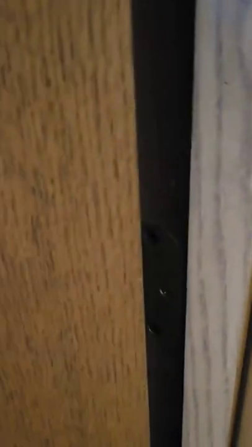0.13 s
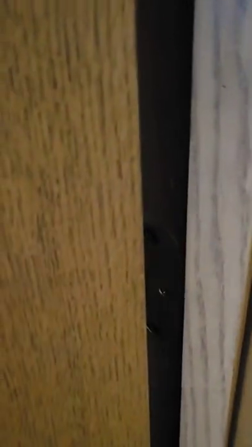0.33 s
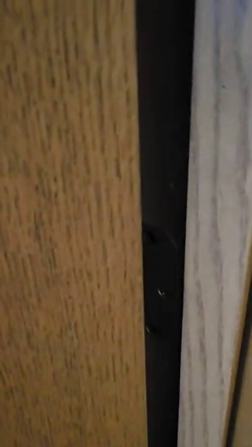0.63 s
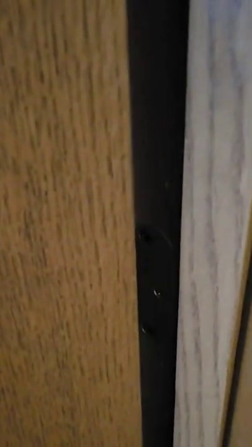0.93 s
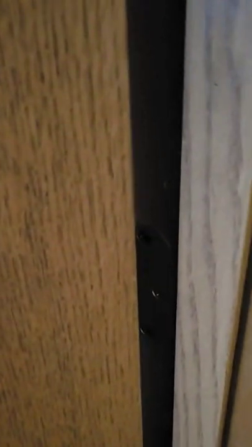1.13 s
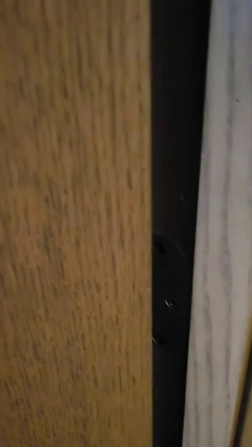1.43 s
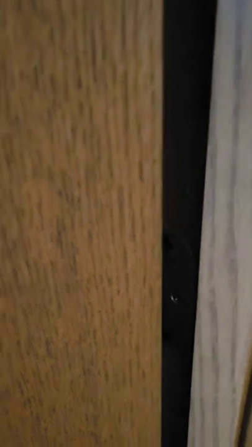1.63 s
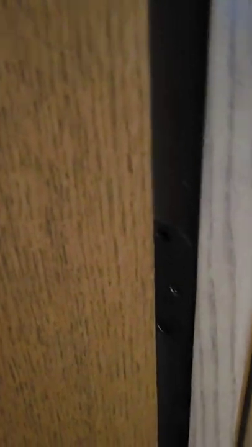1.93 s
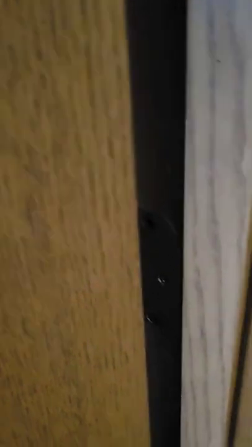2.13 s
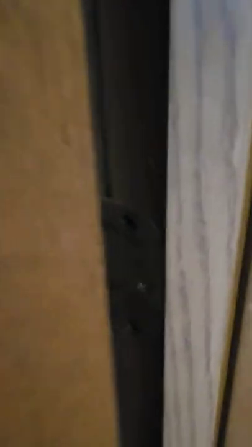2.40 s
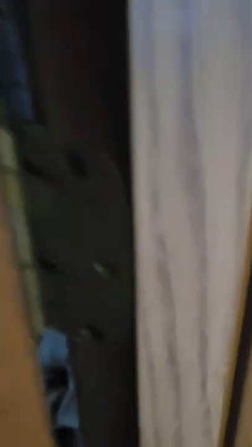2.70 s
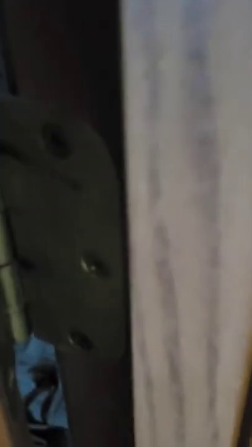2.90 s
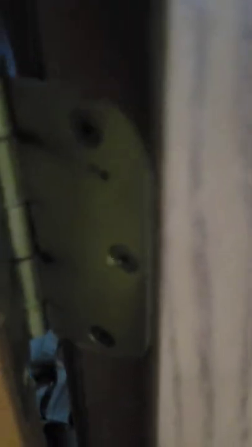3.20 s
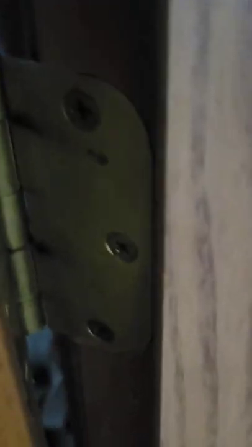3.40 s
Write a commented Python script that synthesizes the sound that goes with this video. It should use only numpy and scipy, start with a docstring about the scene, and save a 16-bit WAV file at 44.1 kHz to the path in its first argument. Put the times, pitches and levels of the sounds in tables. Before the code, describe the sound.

Close to the microphone, a door hinge squeaks several times with thin whistles in between, then lets out a longer squeal that falls into a creak and starts again. A faint hum fills the quiet room.

```python
"""Dry door hinge

A door is rocked to and fro, close by, in a quiet room with mains hum and soft handling bumps. The pin
sticks and slips, ringing hinge leaf and door: each push is an arching squeak that breaks into a rasp,
each return a thin whistle. Then the door swings wide: a second knuckle squeals along with the whistle,
and the stick-slip drops step by step to a slow creak, stops, and starts to squeal again."""
import sys
import numpy as np
from scipy import signal
from scipy.fft import rfft, irfft, next_fast_len
from scipy.io import wavfile
from scipy.ndimage import uniform_filter1d

SR = 44100
rng = np.random.default_rng(int(sys.argv[2]) if len(sys.argv) > 2 else 0)


def dump(signal):
    """Clip the signal to [-1, 1] and save it as 16-bit WAV at the path in sys.argv[1]."""
    limited = np.clip(np.atleast_2d(signal).T, -1, 1)
    pcm = np.round(limited * 32767).astype(np.int16)
    wavfile.write(sys.argv[1], SR, pcm)


N = 156555

# arching squeaks, one curve each: t/s, slip rate/Hz, level/dB
SQUEAKS = [
    [(0, 1810, -40), (.015, 1785, -36), (.04, 1765, -39), (.064, 1705, -39)],
    [(.347, 1400, -49), (.36, 1510, -44), (.377, 1747, -39), (.397, 1777, -43), (.41, 1865, -34.5),
     (.425, 1880, -32), (.445, 1830, -39), (.457, 1660, -46)],
    [(.712, 1450, -52), (.722, 1475, -44), (.738, 1795, -42), (.754, 1853, -37.5), (.776, 1878, -32.5),
     (.802, 1855, -40), (.818, 1810, -42), (.83, 1690, -47)],
    [(1.16, 1430, -52), (1.17, 1460, -45), (1.185, 1580, -44), (1.198, 1767, -43), (1.222, 1798, -43),
     (1.252, 1720, -41), (1.26, 1680, -44)],
    [(1.574, 860, -50), (1.588, 935, -42), (1.602, 947, -37), (1.61, 940, -40)],
    [(1.61, 1600, -43), (1.62, 1640, -43), (1.629, 1775, -41), (1.65, 1755, -42), (1.67, 1720, -44),
     (1.68, 1660, -48)],
]
# rasps as the door slows: t/s, length/s, first slip rate/Hz, last slip rate/Hz, level/dB, jitter/periods
RASPS = [(0.064, 0.022, 1520, 1370, -39.5, 0.012), (0.081, 0.0326, 800, 205.4, -41, 0.082),
         (0.457, .035, 1500, 280, -44.5, 0.085), (0.832, 0.0333, 1080, 320, -47.5, 0.065),
         (1.258, 0.057, 1010, 300, -43.5, 0.098), (1.677, 0.042, 900, 300, -48.5, 0.045),
         (2.066, 0.0315, 675, 590, -45.5, .003), (2.088, .054, 520, 290, -41.5, 0.0033)]
# last single slips at rest: t/s, level/dB
TICKS = [(0.123, -16), (0.487, -33), (1.331, -26.5), (1.728, -34.5), (2.143, -13.5), (2.17, -16)]
# EQ of one slip with the door ajar: f/Hz, level/dB
AJAR_EQ = [(500, -33), (1200, 1.5), (1800, -7), (2600, 2.5), (3600, -1.5), (5400, -8), (7300, -13),
           (9000, -26.5), (12000, -29.5), (15000, -38)]
# EQ of one rasping slip: f/Hz, level/dB
RASP_EQ = [(500, -19), (1000, -10), (1700, 3.5), (2700, -0.5), (4000, -7.5), (5600, -8), (7000, -21.5),
           (9000, -27), (12000, -48), (15000, -42)]
GAP_HZ, GAP_WIDTH_HZ, GAP_DB = 1866, 36, 15.5  # resonance of the narrow gap between door and frame


def pushes():
    """Arching squeaks that swell at the gap's resonance, then break into slowing rasps and a last tick."""
    ajar, rasping = slip_sound(AJAR_EQ), slip_sound(RASP_EQ)
    gap = signal.iirpeak(GAP_HZ, GAP_HZ / GAP_WIDTH_HZ, SR)
    ajar = ajar + undb(GAP_DB) * signal.lfilter(*gap, ajar)
    squeaks = sum(stick_slip(curve, ajar, jitter=0.0073) for curve in SQUEAKS)
    rasps = 0
    for start, length, first, last, db, jitter in RASPS:
        middle = (start + length / 2, np.sqrt(first * last), db + 1.5)
        curve = [(start, first, db), middle, (start + length, last, db - 5.5)]
        rasps += stick_slip(curve, rasping, jitter)
    tick_times, tick_db = np.array(TICKS).T
    ticks = clicks(tick_times, undb(tick_db))
    return ring(undb(-1) * squeaks + ticks, ajar) + undb(-3) * ring(rasps, rasping)


# bright falling squeal that opens the swing: t/s, slip rate/Hz, level/dB
GLIDE = [(2.745, 1720, -72), (2.772, 1700, -46), (2.795, 1668, -38), (2.85, 1650, -36), (2.88, 1620, -33),
         (2.905, 1610, -30), (2.925, 1575, -33), (2.937, 1440, -31), (2.948, 1320, -35)]
# EQ of one slip in that squeal: f/Hz, level/dB
BRIGHT_EQ = [(500, -18), (1630, -6.5), (3250, 2.5), (4900, -2), (6500, 0.5), (8200, -7), (9800, -10),
             (11500, -4.5), (13000, -9), (15000, -22)]
# downward steps, one curve per stick-slip regime: t/s, slip rate/Hz, level/dB
STEPS = [
    [(2.948, 1000, -32), (2.97, 972, -31), (3.0, 950, -34), (3.023, 925, -35)],
    [(3.023, 668, -33), (3.06, 655, -32), (3.088, 637, -32), (3.105, 612, -37)],
    [(3.105, 495, -33), (3.13, 481, -33), (3.16, 459, -33), (3.178, 450, -34)],
]
# slow creak that ends the swing: t/s, slip rate/Hz, level/dB
CREAK = [(3.178, 387, -32), (3.21, 354, -32.5), (3.235, 326, -33.5), (3.26, 220, -34), (3.276, 155, -37.5),
         (3.291, 100, -35.5)]
# EQ of one slip with the door wide open: f/Hz, level/dB
OPEN_EQ = [(240, -32), (400, -3.5), (502, -5.5), (602, -7), (1290, -6), (1370, -1), (1970, -4),
           (2740, -0.5), (3010, -0.5), (4600, 2), (6040, -5), (7580, -0.5), (8560, -18), (9520, -11.5),
           (15000, -23.5)]


def wide_swing():
    """The door opens wide: the slip rate glides down, then drops in steps to a creak."""
    bright, wide = slip_sound(BRIGHT_EQ), slip_sound(OPEN_EQ)
    glide = stick_slip(GLIDE, bright, jitter=0.0014, settle_s=0.036)
    steps = sum(stick_slip(curve, wide, jitter=0.0014) for curve in STEPS)
    creak = stick_slip(CREAK, wide, jitter=0.0044)
    return undb(-2) * (ring(glide, bright) + ring(steps + creak, wide))


# rising squeak as the hinge catches: t/s, slip rate/Hz, level/dB
CATCH = [(3.421, 845, -43), (3.44, 875, -42), (3.45, 950, -42), (3.464, 1000, -40), (3.47, 1300, -40)]
# swelling last squeal: t/s, slip rate/Hz, level/dB
LAST_SQUEAL = [(3.47, 1330, -41), (3.5, 1344, -37), (3.55, 1352, -33)]
# EQ of one slip in both: f/Hz, level/dB
CATCH_EQ = [(500, 9), (1350, -5.5), (2700, 6.5), (4050, 4.5), (5400, -1.5), (6750, -11.5), (8100, -7.5),
            (9500, -26), (12000, -27.5), (15000, -28.5)]


def hinge_catch():
    """The hinge catches again and climbs to a squeal in which every third slip comes ever later."""
    slip = slip_sound(CATCH_EQ)
    catch = stick_slip(CATCH, slip, jitter=0.005)
    squeal = stick_slip(LAST_SQUEAL, slip, jitter=0.0036, limp=0.0228)
    return ring(catch + squeal, slip)


def stick_slip(curve, slip, jitter, limp=0, settle_s=0.0028):
    """One click each time the pin lets go, levelled to ring `slip`; jitter and limp are in periods."""
    s, hz, db = np.array(curve, float).T
    t = np.arange(s[0], s[-1], 1 / SR)
    waver = 1 + 0.0037 * drift(180.5)[:len(t)]
    cycles = np.cumsum(np.interp(t, s, hz) * waver) / SR
    k = np.arange(int(cycles[-1]) + 1)
    times = np.interp(k, cycles, t)
    time_scatter, level_scatter = rng.standard_normal((N // 100, 2))[:len(k)].T
    rough = jitter + 0.051 * np.exp(-(times - s[0]) / settle_s)  # each new regime starts unsteadily
    late = rough * time_scatter + limp * (k % 3 == 0) * k / len(k)
    rate = np.interp(times, s, hz)
    # divide out the power of a steady train at each rate, so the curve shapes the loudness
    power = np.abs(rfft(slip)) ** 2
    harmonics = rate[:, None] * np.arange(1, 160)
    train_power = np.interp(harmonics, np.linspace(0, SR / 2, len(power)), power, right=0).sum(1)
    gain = undb(np.interp(times, s, db) + 11.8 * rough * level_scatter)
    return clicks(times + late / rate, gain * SR / rate / np.sqrt(2 * train_power))


# modes of hinge leaf and door: f/Hz, level/dB over the direct slip, t60/s
LEAF_MODES = [(1602, 8, 0.087), (1834, -0.5, 0.08), (2050, -4.5, 0.017), (2600, 7.5, 0.1),
              (2770, -18, 0.071), (3396, -23, .06), (3807, -6.5, .03), (4720, -1.5, 0.052),
              (5150, -27, 0.034), (5600, -6, 0.056), (7200, -8.5, 0.072), (7808, 7, 0.028),
              (9200, -8, 0.044)]
DISPERSION_S = 0.0012  # lag of the bass behind the treble


def slip_sound(eq):
    """One slip and the modes it rings; bending waves bring the treble first and smear the click."""
    size = SR // 10
    lag = DISPERSION_S * (1 - np.sqrt(np.linspace(0, 1, size // 2 + 1)))
    smear = np.exp(-2j * np.pi * np.cumsum(lag) * SR / size)
    direct = irfft(rfft(equalise(signal.unit_impulse(size), eq)) * smear, size)
    out = direct.copy()
    for hz, db, t60 in LEAF_MODES:
        mode = signal.iirpeak(hz, hz * t60 * np.pi / np.log(1000), SR)
        out += undb(db) * signal.lfilter(*mode, direct + 1e-18)
    return out


# whistles of the returns, one curve each: t/s, f/Hz, level/dB
WHISTLES = [
    [(0.203, 4030, -62), (0.217, 4070, -50.5), (0.245, 3960, -62)],
    [(0.952, 3962, -53), (0.96, 3997, -48), (0.99, 4055, -44), (1.03, 4095, -50.5), (1.055, 4010, -67)],
    [(1.805, 4012, -44), (1.815, 4020, -45), (1.839, 4090, -39), (1.889, 4190, -51.5), (1.907, 4080, -44.5),
     (1.935, 3950, -69)],
    [(2.24, 3790, -72), (2.258, 3980, -44.5), (2.3, 4065, -53.5), (2.42, 4033, -60), (2.52, 4002, -47.5),
     (2.62, 4014, -46), (2.7, 4055, -55.5), (2.77, 4030, -46), (2.815, 4084, -50.5), (2.828, 4180, -57),
     (2.9, 4235, -53)],
]
# their harmonics, fundamental first: level/dB
WHISTLE_HARMONICS = [0.5, -7.5, -32]
# faint overtone whistle high above the rest: t/s, f/Hz, level/dB
HIGH_WHISTLE = [(1.03, 13100, -84), (1.09, 13700, -82), (1.16, 14400, -81), (1.22, 14000, -80),
                (1.28, 13200, -86)]


def returns():
    """The hinge whistles almost purely on each return; a second knuckle joins the last whistle."""
    phase, gain = follow(HIGH_WHISTLE, wobble=0.004)
    whistles = gain * np.sin(phase)
    for curve in WHISTLES:
        phase, gain = follow(curve, wobble=0.00056)
        whistles += gain * fluttering_tone(phase, WHISTLE_HARMONICS)
    return np.sqrt(2) * (whistles + undb(-1.5) * knuckle_squeal(phase))


# squeal of the second knuckle: t/s, f/Hz, level/dB
SQUEAL = [(2.465, 2200, -54), (2.48, 2165, -43), (2.5, 2135, -41), (2.58, 2120, -37), (2.65, 2143, -36),
          (2.69, 2135, -37), (2.72, 2205, -42), (2.775, 2165, -37), (2.8, 2140, -46)]
# its harmonics, fundamental first: level/dB
SQUEAL_HARMONICS = [0.5, -4, -16, -25.5, -25.5, -28, -44]


def knuckle_squeal(whistle_phase, coupling_rad=0.06):
    """A second knuckle squeals, its phase pulled to and fro by the whistle."""
    phase, gain = follow(SQUEAL, wobble=0.002)
    pull = coupling_rad * np.sin(whistle_phase - 2 * phase)
    return gain * fluttering_tone(phase + pull, SQUEAL_HARMONICS)


def follow(curve, wobble):
    """Phase and gated envelope of a tone riding a curve; wobble is a share of the pitch."""
    s, hz, db = np.array(curve, float).T
    t = np.arange(N) / SR
    gate = uniform_filter1d(1. * ((t >= s[0]) & (t <= s[-1])), size=180)
    pitch = np.interp(t, s, hz) * (1 + wobble * drift(300))
    return 2 * np.pi * np.cumsum(pitch) / SR, gate * undb(np.interp(t, s, db))


def fluttering_tone(phase, levels, flutter_db=2, flutter_hz=39.693):
    """Harmonics that flutter in level, the upper ones more."""
    return sum(undb(db + flutter_db * np.sqrt(k) * drift(flutter_hz)) * np.sin(k * phase)
               for k, db in enumerate(levels, 1))


def bright_tail(slips):
    """A tight, bright tail of dense reflections on the slips' treble."""
    treble = signal.sosfilt(signal.butter(4, 2300, "high", fs=SR, output="sos"), slips)
    return reflections(treble, t60=0.033, treble_t60=0.033, delay_s=0.00044)


def reflections(x, t60, treble_t60, delay_s):
    """Dense reflections after a pre-delay, with a separate decay time above 6 kHz."""
    t = np.arange(SR) / SR
    noise = rng.standard_normal(SR)
    low = signal.sosfiltfilt(signal.butter(2, 6000, fs=SR, output="sos"), noise)
    tail = (low * undb(-60 * t / t60) + (noise - low) * undb(-60 * t / treble_t60)) * (t > delay_s)
    return ring(x, tail / np.sqrt(np.sum(tail ** 2)))


# handling bumps: t/s, f/Hz, level/dB
BUMPS = [(0.151, 46.8, -33.5), (.53, 52.7, -35), (0.662, 47, -39)]


def bumps(rise_s=0.02):
    """Soft, deep bumps from handling, each a low sine that swells and dies."""
    out = 0
    for start, hz, db in BUMPS:
        age = np.maximum(np.arange(N) / SR - start, 0)
        envelope = (age / rise_s * np.exp(1 - age / rise_s)) ** 2
        out += undb(db) * envelope * np.sin(2 * np.pi * hz * age)
    return out


# EQ of the ventilation noise: f/Hz, level/dB
AIR_EQ = [(15, -7.5), (25, -9), (75, -7), (196, -10.5), (404, -14.5), (462, -14.5), (621, -21),
          (709, -17.5), (856, -25), (1120, -25), (1670, -34.5), (1860, -33), (2070, -37), (4150, -52.5),
          (15000, -66)]
AIR_DB = -49.1  # level between 90 and 1200 Hz
# hum of mains and a fan: f/Hz, level/dB
HUM = [(62.5, -42.5), (120, -58.5), (160, -70), (235, -60.5), (282, -59.5), (376, -63)]


def room_tone():
    """A bed of soft ventilation noise under a wavering hum."""
    t = np.arange(N) / SR
    air = equalise(rng.standard_normal(N), AIR_EQ)
    air = signal.sosfilt(signal.butter(4, 36, "high", fs=SR, output="sos"), air)
    body = signal.sosfilt(signal.butter(4, [90, 1200], "band", fs=SR, output="sos"), air)
    hum = 0
    for hz, db in HUM:
        gain = undb(db + 0.5 * drift(7.74))
        hum += gain * np.sin(2 * np.pi * (hz * t + rng.random()) + 0.32 * drift(3.9))
    return undb(AIR_DB) * air / np.std(body) + np.sqrt(2) * hum


def undb(db):
    """Decibels to gain."""
    return 10 ** (np.asarray(db) / 20)


def drift(rate_hz):
    """Smooth random drift with a spread near 1."""
    hold = max(2, int(SR / rate_hz))
    steps = np.repeat(rng.standard_normal(N // hold + 1), hold)
    return 1.3 * uniform_filter1d(uniform_filter1d(steps, hold), hold)[:N]


def equalise(x, eq):
    """Minimum-phase EQ through (f/Hz, level/dB) points, rolling off below the first."""
    hz, db = np.array(eq, float).T
    size = next_fast_len(len(x) + SR // 10, True) * 2
    f = np.maximum(np.arange(size // 2 + 1) * SR / size, 1)
    shape_db = np.interp(np.log(f), np.log(hz), db) + 20 * np.log10(np.minimum(f / hz[0], 1))
    cepstrum = irfft(np.log(undb(shape_db)))
    cepstrum[1:size // 2] *= 2
    cepstrum[size // 2 + 1:] = 0
    return irfft(rfft(x, size) * np.exp(rfft(cepstrum)))[:len(x)]


def clicks(times, sizes):
    """Band-limited impulses at exact times."""
    at = np.asarray(times)[:, None] * SR
    index = np.floor(at).astype(int) + np.arange(-7, 9)
    shape = np.sinc(index - at) * np.cos(np.pi * (index - at) / 16) ** 2
    inside = (index >= 0) & (index < N)
    return np.bincount(index[inside], (shape * np.asarray(sizes)[:, None])[inside], N)


def ring(x, response):
    """Send a sound through an impulse response."""
    return signal.oaconvolve(x, response)[:N]


def scene():
    """The hinge up front, the room behind it; the same in both channels."""
    slips = pushes() + wide_swing() + hinge_catch()
    hinge = slips + undb(-1) * bright_tail(slips) + returns()
    reverb = reflections(hinge, t60=0.37, treble_t60=0.2, delay_s=0.0053)
    mix = hinge + undb(-14) * reverb + room_tone() + bumps()
    return np.array([mix, mix])


def record(dry):
    """A steep high cut at 15.6 kHz."""
    return signal.sosfilt(signal.ellip(10, .2, 80, 15600, fs=SR, output="sos"), dry)


dry = scene()
out = record(dry)
dump(out)
```